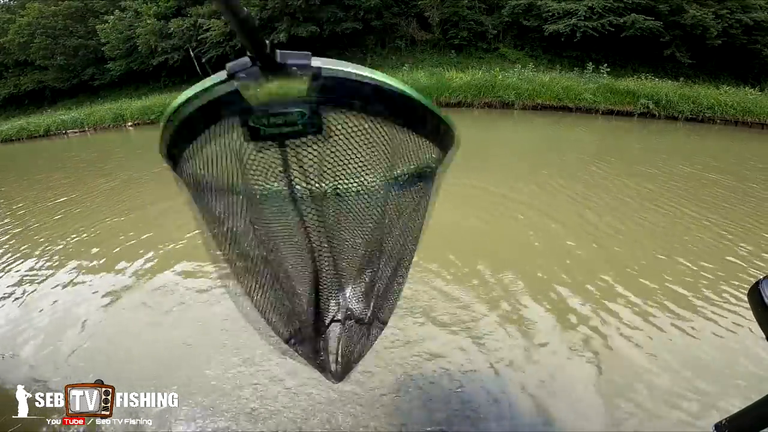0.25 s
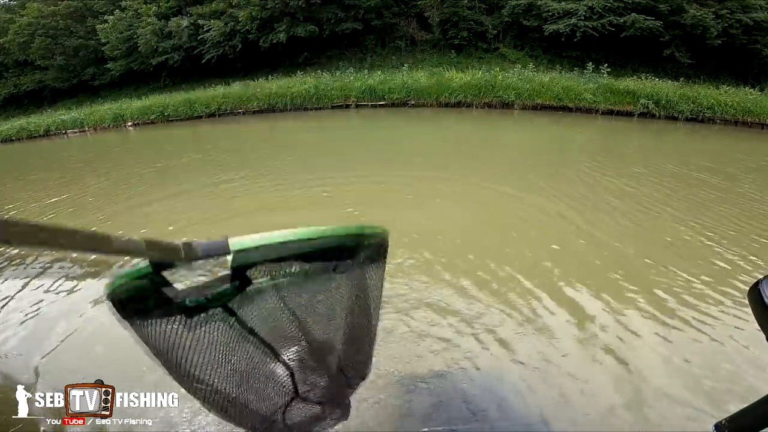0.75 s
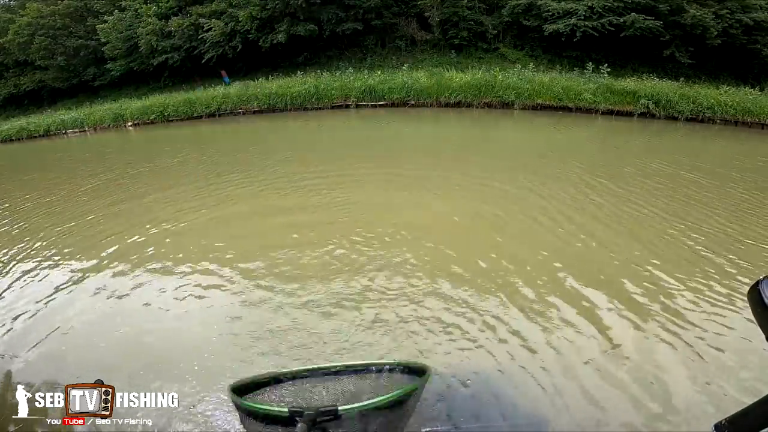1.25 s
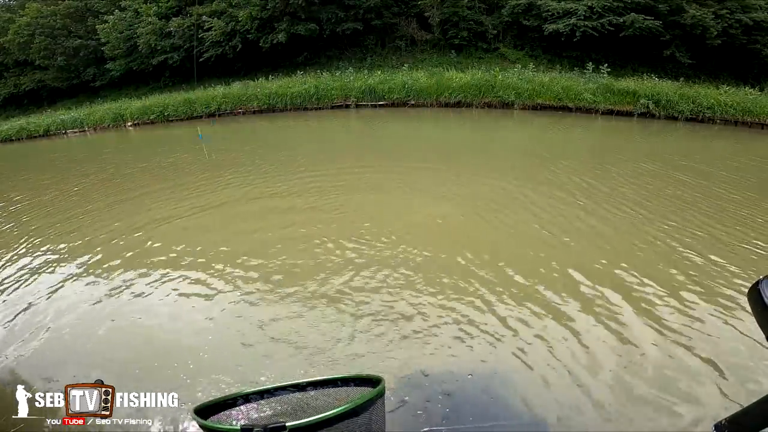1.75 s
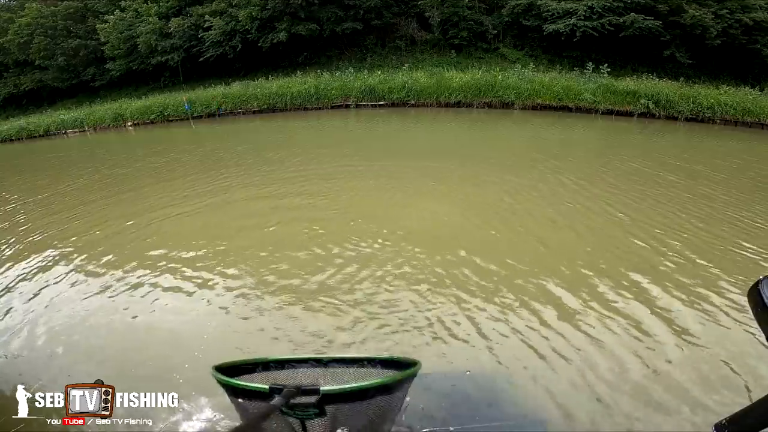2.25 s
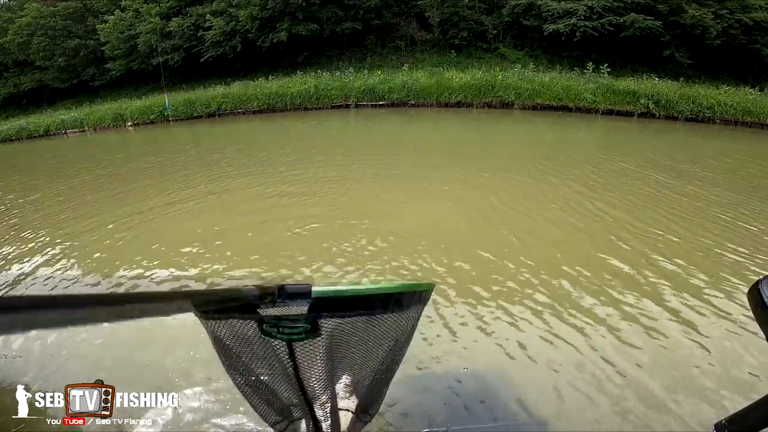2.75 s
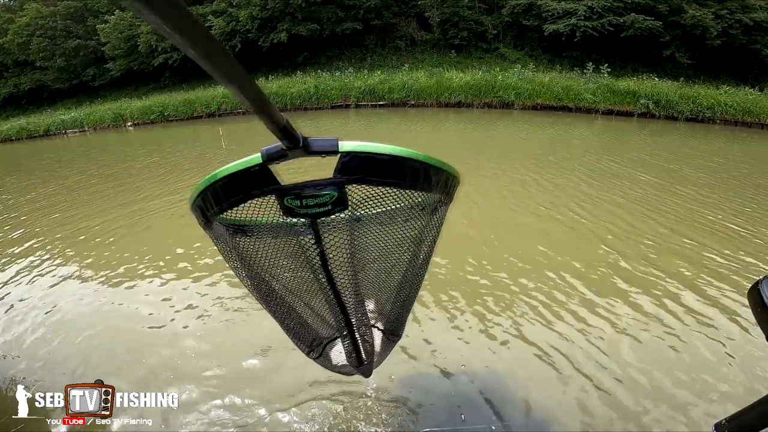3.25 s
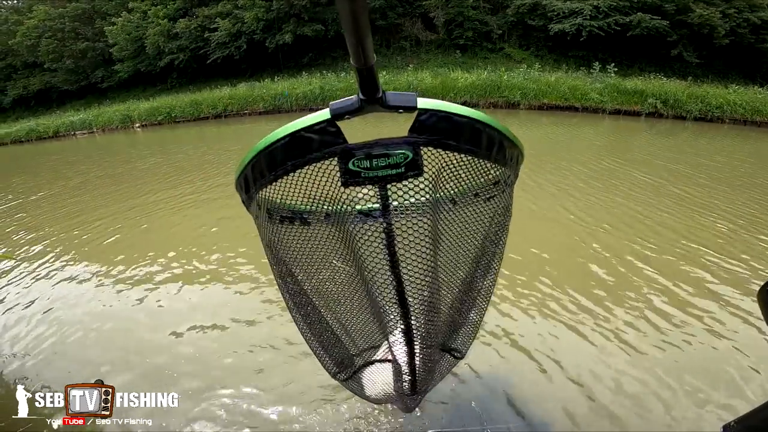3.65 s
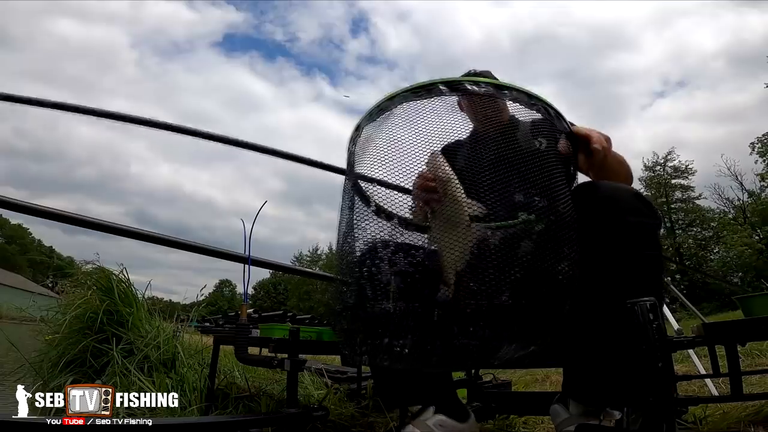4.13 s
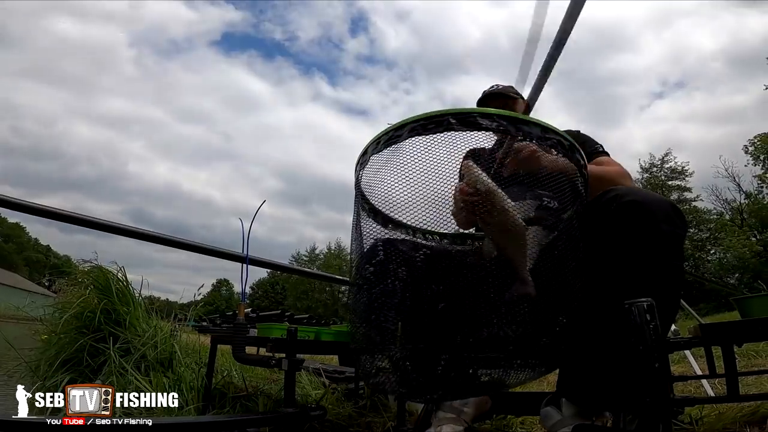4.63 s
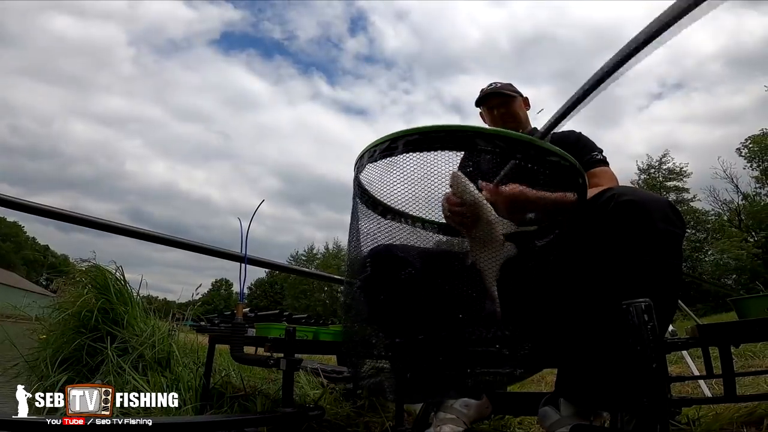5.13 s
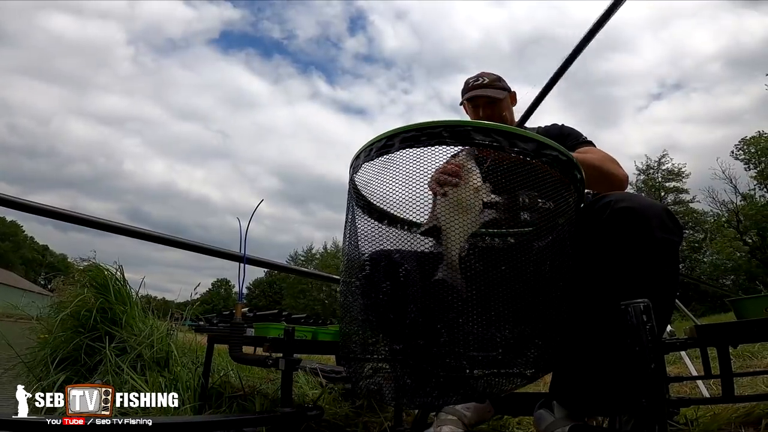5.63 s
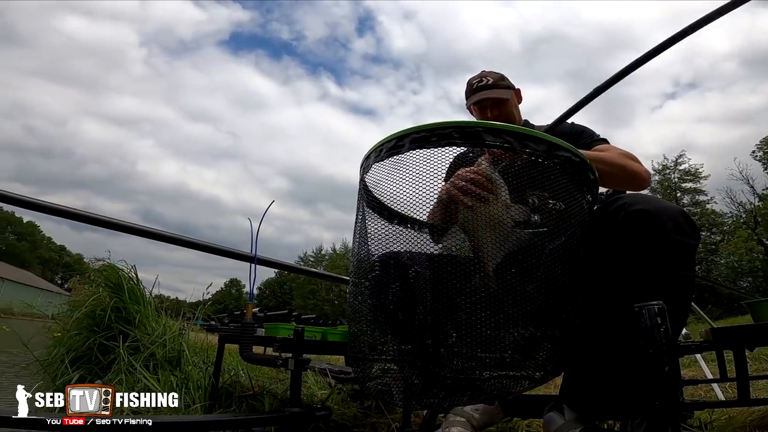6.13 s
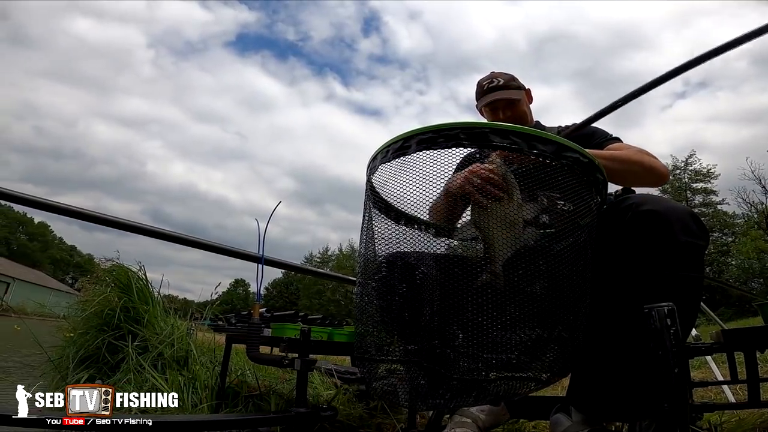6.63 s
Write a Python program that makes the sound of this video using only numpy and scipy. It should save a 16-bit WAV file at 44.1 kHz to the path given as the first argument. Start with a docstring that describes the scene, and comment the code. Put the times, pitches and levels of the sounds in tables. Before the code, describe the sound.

Wind buffets the microphone as a landing net dips and lifts streaming from a canal, then a fish kicks in wet mesh close by.

```python
"""A breeze buffets the microphone over a soft hush of trees as a small fish in a landing net swings over a canal.
The net is dipped, then lifted out streaming and dripping. Then, close by, the fish kicks in the wet mesh
while the angler takes hold of it and slides the pole back.
Wind, trees, mesh and pole are shaped noise or snaps; water is ringing bubbles, droplets and air pockets."""
import sys
import numpy as np
from scipy import signal
from scipy.fft import rfft, irfft, next_fast_len
from scipy.io import wavfile
from scipy.ndimage import uniform_filter1d

SR = 44100
rng = np.random.default_rng(int(sys.argv[2]) if len(sys.argv) > 2 else 0)


def int16_out(signal):
    """Quantize to a 16-bit WAV file."""
    q = np.round(np.clip(np.atleast_2d(signal).T, -1, 1) * 32767)
    wavfile.write(sys.argv[1], SR, q.astype(np.int16))


N = 303319
TIME = np.arange(N) / SR
CUT_S = 4.18   # the listening point moves from over the water to the bank

# spectrum of falling water: hz, relative_db_per_hz
SPRAY_COLOUR = [(400, -70), (800, -8), (1100, 2.5), (2300, 7.5), (4500, 1), (7000, -6.5), (13000, -21.5),
                (16000, -43)]
# spectrum of wet mesh: hz, relative_db_per_hz
MESH_COLOUR = [(210, -11.5), (350, -11), (459, -10), (674, -9.5), (844, -10.5), (1020, -4), (2580, -6),
               (3850, -5.5), (7430, -23), (10100, -27.5), (14800, -49), (16000, -67)]


def from_db(db):
    """Decibels to gain."""
    return 10 ** (np.asarray(db) / 20)


def rms_one(x):
    """Scale to rms 1."""
    return x / np.sqrt(np.mean(x ** 2) + 1e-20)


def in_time(rows):
    """Each column of a curve at every sample."""
    s, *columns = np.transpose(rows)
    return [np.interp(TIME, s, c) for c in columns]


def add(out, s, sound):
    """Mix a sound in at time s."""
    at = max(int(s * SR), 0)
    out[:, at:at + sound.shape[-1]] += sound[..., :max(N - at, 0)]


def panned(left_right_db):
    """Left and right gains of constant power."""
    gains = from_db(np.array([left_right_db, -left_right_db]).reshape(2, -1) / 2)
    return gains / np.sqrt(np.mean(gains ** 2, axis=0))


def coloured(x, spectrum, tilt_db=0):
    """Filter by a (Hz, dB) table, tilted by so many dB an octave."""
    size = next_fast_len(x.shape[-1])
    octave = np.log2(np.maximum(np.arange(size // 2 + 1) * SR / size, 1))
    hz, db = np.transpose(spectrum)
    gain_db = np.interp(octave, np.log2(hz), db) + tilt_db * (octave - np.log2(hz).mean())
    return irfft(rfft(x, size) * from_db(gain_db), size)[..., :x.shape[-1]]


def drift(knots_per_s):
    """Random curve: straight lines between Gaussian knots of spread 1."""
    knots = rng.standard_normal(4000)
    return np.interp(TIME * knots_per_s, np.arange(len(knots)), knots)


def stereo(pair):
    """Two unrelated signals as mid and side; the side follows its own spectrum."""
    # side against mid: hz, side_mid_db
    side_colour = [(100, -19.5), (700, -9), (1300, -9), (2400, -4), (4400, -4.5), (8000, -4)]
    return pair[0] + coloured(pair[1], side_colour) * [[1], [-1]]


def grains(size, per_s, spread_db):
    """Two trains of tiny random snaps of very uneven strength."""
    strength = from_db(spread_db * np.minimum(rng.exponential(1, (2, size)), 4))
    struck = rng.random((2, size)) < per_s / SR
    return rms_one(struck * strength * rng.choice([-1, 1], (2, size)))


def swell(s, db, build_s, linger):
    """Gain that climbs its last 20 dB in build_s to a peak at s, then falls 20 dB in linger * build_s."""
    away_s = np.maximum(s - TIME, (TIME - s) / linger)
    return from_db(db - 20 * np.minimum(away_s / build_s, 10))


def hush():
    """Far trees and open air: shaped noise, heard first over the water, then from low on the bank."""
    # spectra: hz, relative_db_per_hz
    water_colour = [(35, -27), (90, -2), (170, 4), (240, 0), (850, -18), (1200, -10), (2800, -22.5),
                    (4600, -23), (12000, -41), (15000, -70)]
    bank_colour = [(71, -52), (120, -4.5), (203, 1), (323, -10.5), (616, -19), (1110, -20.5), (1280, -19.5),
                   (5140, -31.5), (15000, -59.5)]
    water_db, bank_db = -52, -49.5
    air = rng.standard_normal((2, N))
    over_water = from_db(water_db) * rms_one(stereo(coloured(air, water_colour)))
    on_bank = from_db(bank_db) * rms_one(stereo(coloured(air, bank_colour)))
    return np.where(TIME < CUT_S, over_water, on_bank)


def wind():
    """Eddies rumble at the ports, partly shared over water, wholly on the bank; gusts swell, dull bumps hit."""
    # spectrum of the eddies: hz, relative_db_per_hz
    eddy_colour = [(12, -18), (22, 4.5), (75, 0), (120, -6.5), (180, -11), (450, -45.5), (1000, -116)]
    # light air between gusts, before flutter: time_s, level_db
    breeze_curve = [(0, -69), (1.5, -47.5), (2.3, -62), (3.0, -63), (3.8, -80), (4.2, -47), (4.9, -54.5),
                    (6.0, -49), (6.87, -38.5)]
    # gusts, before flutter and the bank's narrowing: peak_s, peak_db, build_s, left_right_db
    gust_rows = [(.06, -28, 0.11, -9), (.18, -37.5, 0.53, -1), (0.435, -30.5, 0.083, 1.5),
                 (.66, -34.5, 0.23, -1.5), (0.8, -31.5, 0.12, -7), (1.11, -39, 0.067, -8),
                 (1.27, -37.5, 0.46, -0.5), (1.409, -29, 0.1, -10.5), (2.16, -34, 0.051, -8),
                 (2.53, -42.5, 0.11, -7), (4.02, -32.5, 0.11, 4), (4.113, -29, 0.038, -4.5),
                 (5.23, -30, 0.17, -20), (5.51, -33.5, 0.12, -3), (5.72, -33, 0.19, -6),
                 (5.839, -32.5, 0.077, -8), (6.17, -39, 0.16, -2), (6.454, -26, 0.079, 2),
                 (6.57, -25.5, 0.14, -3), (6.81, -28.5, 0.15, 3)]
    # dull bumps, before the bank's narrowing: peak_s, peak_db, pitch_hz, left_right_db
    bump_rows = [(0.19, -19, 168, -33), (1.392, -19, 75.6, -36), (2.146, -22.5, 115, -29),
                 (3.949, -10.5, 143, -39), (3.964, -19.5, 122, -11), (3.993, -19, 74, 30),
                 (5.256, -22, 85, -1), (5.733, -21, 74, 0)]
    linger, bump_cycles = 0.92, 0.18   # gust fall / build time; a bump swells and dies within part of its cycle
    breeze_db, = in_time(breeze_curve)
    gust_power = sum((swell(s, db, build_s, linger) * panned(side_db)) ** 2
                     for s, db, build_s, side_db in gust_rows)
    own = rng.standard_normal((2, N)) * (TIME < CUT_S)
    shared = rng.standard_normal(N) * np.where(TIME < CUT_S, .55, .9)
    rumble = coloured(own + shared, eddy_colour)
    # level out the noise, so the gust alone sets the strength
    rumble = rumble / np.sqrt(uniform_filter1d(np.mean(rumble ** 2, axis=0), size=SR // 8))
    out = rumble * np.sqrt(from_db(breeze_db) ** 2 + gust_power) * from_db(3.7 * drift(30))
    t = np.arange(-SR // 20, SR // 20) / SR
    for s, db, hz, side_db in bump_rows:
        bump = -from_db(db) * np.cos(2 * np.pi * hz * t) / np.cosh(hz * t / bump_cycles)
        add(out, s + t[0], bump * panned(side_db))
    return out


def flow():
    """Level of the water leaving the net, in dB: a trickle, spills, and the stream of the lift, which drains."""
    # stream as the net is lifted out: time_s, level_db
    lift_curve = [(2.5, -71), (2.6, -53.5), (2.81, -47), (2.99, -48.5), (3.09, -41.5), (3.13, -45.5),
                  (3.26, -41), (3.35, -44.5), (3.41, -50)]
    # water shaken out as the net swings and dips: peak_s, peak_db, build_s
    spill_rows = [(.03, -49, .08), (.17, -48, .2), (0.469, -54, .25), (0.889, -51.5, .3), (1.26, -52, .15),
                  (1.43, -43, .15), (1.6, -47, .15), (1.791, -51.5, .15), (3.55, -50, .05),
                  (3.782, -48.5, .06)]
    trickle_db, drain_db_per_s, linger = -64.5, 24.5, 1.4   # linger: draining / build-up time
    lift_db, = in_time(lift_curve)
    drained_db = drain_db_per_s * np.maximum(TIME - lift_curve[-1][0], 0)
    stream = from_db(lift_db - drained_db) * (TIME > lift_curve[0][0])
    spill_power = sum(swell(s, db, build_s, linger) ** 2 for s, db, build_s in spill_rows)
    return 10 * np.log10(from_db(trickle_db) ** 2 + spill_power + stream ** 2)


def churn(flow_db):
    """Level and pitch of the gurgle: it follows the flow as the bag churns in air; its bubbles deepen."""
    # net bag in the canal: start_s, end_s, level_re_flow_db (before the cap), first_pitch_hz
    churn_rows = [(1.389, 1.822, -4.5, 1390), (2.698, 3.289, -2, 1143)]
    fade_db_per_s, sink_octaves_per_s, top_db = 171, 0.603, -46
    level_db, hz = np.full(N, -np.inf), np.zeros(N)
    for start, end, db, first_hz in churn_rows:
        inside = np.clip(TIME, start, end)
        this_db = np.minimum(flow_db + db, top_db) - fade_db_per_s * abs(TIME - inside)
        this_hz = first_hz * 2 ** (-sink_octaves_per_s * (inside - start))
        hz = np.where(this_db > level_db, this_hz, hz)
        level_db = np.maximum(level_db, this_db)
    return level_db, hz


def bubble(hz, t60, rise):
    """A bubble rings down 60 dB in t60 seconds while its pitch climbs by the share 'rise'."""
    t = np.arange(int(t60 * SR) + 2) / SR
    return np.sin(2 * np.pi * hz * t * (1 + rise * t / t60 / 2)) * from_db(-60 * t / t60)


def bubble_cloud(level_db, middle_hz, octaves, cycles, spread_db, rise, count):
    """Many small bubbles around a middle pitch, most of them born where the flow is strong."""
    out, strength = np.zeros((2, N)), from_db(level_db) * (TIME < CUT_S)
    chance = np.cumsum(np.sqrt(strength))
    births = np.searchsorted(chance / chance[-1], (np.arange(count) + rng.random(count)) / count)
    for at, (a, b, bulk, life, side) in zip(np.minimum(births, N - 1), rng.random((count, 5))):
        hz = middle_hz[at] * 2 ** (octaves * (a - b))
        gain = strength[at] ** .75 * np.sqrt(hz) * from_db(spread_db * bulk ** 2)
        ring = bubble(hz, cycles * (.5 + life) / hz, rise * life)
        add(out, at / SR, gain * panned((side - .5) * hz / 400) * ring)
    return rms_one(out) * np.sqrt(np.mean(strength ** 2))


def droplets(per_s, cycles, spread_db, count):
    """Spray: each droplet rings down within 'cycles' at one of 'count' pitches; each pitch fluctuates alone."""
    out = 0
    for hz in np.geomspace(900, 14000, count):
        r, w = from_db(-60 * hz / (cycles * SR)), 2 * np.pi * hz / SR
        hits = grains(N, per_s / count, spread_db) + 1e-18
        rings = signal.lfilter([1, 0, -1], [1, -2 * r * np.cos(w), r * r], hits)
        out = out + rms_one(rings) * np.sqrt(hz) * from_db(3 * drift(110))
    return out


def runoff():
    """Water falls through the mesh: thin spray, a patter of drops, ringing bubbles and larger gurgling ones."""
    flow_db = flow()
    gurgle_db, gurgle_hz = churn(flow_db)
    pouring = np.interp(TIME, [1.3, 1.4], [0, 1])   # more drops and bubbles once the net has met the water
    fine = droplets(per_s=5000, cycles=12.4, spread_db=1.5, count=16)
    spray = rms_one(stereo(coloured(fine, SPRAY_COLOUR))) * from_db(-2 * pouring)
    ticks = droplets(per_s=800, cycles=26, spread_db=4.5, count=18)
    impacts = grains(N, per_s=200, spread_db=4)
    patter = rms_one(stereo(coloured(rms_one(ticks) + impacts / 2, SPRAY_COLOUR, tilt_db=4.0)))
    patter = patter * from_db(-5 * (1.75 - pouring))
    falling = (spray + patter) * from_db(flow_db - 1.5 + 3.6 * drift(70)) * (TIME < CUT_S)
    fizz = bubble_cloud(flow_db - 14 + 11 * pouring, np.full(N, 2700), octaves=1.1, cycles=38,
                        spread_db=13, rise=.25, count=600)
    gurgle = bubble_cloud(gurgle_db, gurgle_hz, octaves=.75, cycles=32, spread_db=12, rise=.18, count=240)
    return falling + fizz + gurgle


def wet_mesh(pair, tilt_db, fold_hz, uneven_db):
    """Mesh colour: one main fold resonates; smaller folds and water pockets differ at every touch."""
    fold_db, fold_octaves = 5, 0.31   # height and width of the main resonance
    hz = np.geomspace(200, 16000, 60)
    main_db = fold_db * np.exp(-(np.log2(hz / fold_hz) / fold_octaves) ** 2 / 2)
    folds = np.column_stack([hz, main_db + uneven_db * rng.standard_normal(len(hz))])
    return rms_one(stereo(coloured(coloured(pair, folds), MESH_COLOUR, tilt_db)))


def dragging(size, tilt_db, fold_hz, count):
    """Patches of mesh catch and let go on their own, each with its own colour; single threads crackle on top."""
    crackle_db = -5   # threads that snap free, against the drag
    out = 0
    for _ in range(count):
        snaps = wet_mesh(grains(size, per_s=1000, spread_db=2.2), tilt_db, fold_hz, uneven_db=4.5)
        out = out + snaps * from_db(4.5 * drift(220)[:size])
    # level out the snaps, so the pull alone sets the strength
    out = out / np.sqrt(uniform_filter1d(np.mean(out ** 2, axis=0), size=SR // 70))
    crackle = wet_mesh(grains(size, per_s=170, spread_db=2), tilt_db, fold_hz, uneven_db=4.5)
    return (out + from_db(crackle_db) * crackle) / np.hypot(1, from_db(crackle_db))


def fish():
    """Smacks are single wet cracks; kicks are short runs of snaps as mesh tightens and drags over scales."""
    # smacks of fish and wet net: start_s, nominal_db, tilt_db_per_octave, fold_hz
    smack_rows = [(0.158, -45, 12, 4970), (0.1862, -26, 2, 3370), (.192, -33, 3, 3200),
                  (0.944, -32.5, 0.5, 2000), (1.032, -29.5, 3.5, 1440), (1.0934, -31.5, 5.5, 3650),
                  (1.3606, -22, 7.5, 1040), (1.388, -29, 2.5, 3000), (1.676, -32, -2.5, 3000),
                  (3.347, -31.5, 3, 1900), (4.938, -21, -1.5, 1030), (4.94, -33, 9, 1200),
                  (5.005, -29, 3.5, 3830), (5.1128, -33, 0, 2400), (5.3363, -34.5, 10.5, 5840),
                  (6.207, -39.5, 9, 8300)]
    # wriggles in wet mesh: start_s, nominal_db, length_s, tilt_db_per_octave, fold_hz
    kick_rows = [(0.02, -41, 0.0033, 8, 3380), (0.194, -45.5, 0.033, -3, 2500),
                 (0.938, -40, 0.034, 1.1, 1650), (1.021, -44.5, 0.046, 2.5, 2850),
                 (1.269, -40, 0.01, -6, 2000), (1.362, -38.5, 0.06, 3.5, 1290),
                 (1.555, -34, 0.011, 1, 2920), (1.581, -41, 0.017, 7, 3650),
                 (4.747, -45.5, 0.0094, -1, 3000), (4.798, -35, 0.036, 1.5, 2150),
                 (4.857, -38.5, 0.018, 2.5, 3960), (4.933, -29.5, 0.016, -0.5, 755),
                 (4.958, -39, 0.055, -0.5, 930), (5.046, -41, 0.0095, 1.5, 3000),
                 (5.106, -36.5, 0.022, 2.5, 2460), (5.155, -32.5, 0.0091, -0.2, 3340),
                 (5.237, -41.5, 0.0068, -0.5, 3630), (5.296, -46.5, 0.0055, 4, 2900),
                 (5.439, -45, 0.0064, -2, 650), (5.479, -38, 0.0047, -4.5, 875),
                 (5.519, -43.5, 0.0085, 12, 5340), (5.576, -39, 0.02, -0.5, 2380),
                 (5.635, -48, 0.011, -0.5, 2800), (5.675, -40, 0.0035, -0.5, 1050),
                 (5.692, -41, 0.021, -0.2, 3000), (5.806, -43.5, 0.0098, 1.5, 2360),
                 (5.894, -32.5, 0.02, -0.5, 3830), (5.943, -45.5, 0.033, -1, 2440)]
    smack_t60_s, kick_t60_s = 0.043, 0.091
    kick_lead_s = .03   # the mesh tightens faintly for this long before it slips
    out, t = np.zeros((2, N)), np.arange(SR // 5) / SR
    for s, db, tilt_db, fold_hz in smack_rows:
        crack = wet_mesh(rng.standard_normal((2, len(t))), tilt_db, fold_hz, uneven_db=3)
        crack = crack * np.minimum(t / .0004, 1)
        add(out, s, crack * (from_db(db + 4.5 - 60 * t / 0.0026) + from_db(db - 1.5 - 60 * t / smack_t60_s)))
    t = t - kick_lead_s
    rise_db = np.interp(t, [-kick_lead_s, 0, .003], [-33, -14, 0])
    for s, db, length, tilt_db, fold_hz in kick_rows:
        fade_db = -60 * np.maximum(t - length, 0) / kick_t60_s
        catching_db = 2 * drift(260)[:len(t)]
        drag = dragging(len(t), tilt_db, fold_hz, count=4)
        add(out, s + t[0], drag * from_db(db + rise_db + fade_db + catching_db))
    return out * panned(3.4 * (TIME < CUT_S))


def plips():
    """A hard drop's bubble bursts at once: a plink of a few cycles, a quick echo if high, a faint patter."""
    # hard drops: start_s, plink_db (before its decay), first_pitch_hz
    plip_rows = [(.047, -34, 5000), (.254, -32, 5000), (.372, -35, 3600), (1.4664, -31, 540),
                 (2.8632, -24.5, 1900), (3.042, -24, 3400), (3.083, -21, 3080), (3.103, -21, 4570),
                 (3.201, -22.5, 2980), (3.397, -24, 4070), (3.595, -26, 4640), (3.7371, -15.5, 3600),
                 (3.761, -28, 1750), (3.7672, -28, 2500), (3.8456, -17.5, 4080), (4.1371, -24, 1530)]
    t60_cycles, echo_s, echo_db = 11.7, 0.00244, -5   # the echo comes from the bank
    out, t = np.zeros((2, N)), np.arange(SR // 16) / SR
    for s, db, hz in plip_rows:
        plink = from_db(db) * bubble(hz, t60_cycles / hz, rise=.2)
        plink = plink * np.minimum(np.arange(len(plink)) * 4 * hz / SR, 1)   # pinches off in a quarter cycle
        splash = wet_mesh(grains(len(t), per_s=1500, spread_db=3), 3 * np.log2(hz / 1500), hz, uneven_db=3)
        add(out, s, plink)
        add(out, s + echo_s, from_db(echo_db) * plink * (hz > 1600))
        add(out, s, splash * from_db(db - 22 - 60 * t / .06))
    return out


def swishes():
    """Fine spray is flicked off the swinging mesh in a bright, smooth hiss."""
    # swings of the net, before flutter: peak_s, peak_db, build_s
    swing_rows = [(.15, -46, 0.058), (.47, -56.5, 0.41), (0.899, -61, 0.3), (2.402, -54, 0.044)]
    linger, tilt_db = 0.35, 9.5   # dying / build-up time; dB per octave brighter than spray
    hiss = rms_one(stereo(coloured(rng.standard_normal((2, N)), SPRAY_COLOUR, tilt_db)))
    gain = sum(swell(s, db, build_s, linger) for s, db, build_s in swing_rows)
    return hiss * gain * from_db(4.9 * drift(147))


def drops():
    """Each drop ticks, rings a bubble, splashes and may rebound; the bank returns a quick echo."""
    # drops and plops that trap a bubble: start_s, ring_db (before its decay), first_pitch_hz
    drop_rows = [(0.389, -43.5, 905), (.76, -43, 3280), (0.778, -35, 1970), (1.362, -10, 2080),
                 (1.411, -34, 1354), (1.444, -34, 4440), (1.533, -35, 3870), (1.617, -47, 1054),
                 (1.6763, -19, 1280), (1.6835, -25.5, 1080), (1.703, -37, 1090), (1.729, -40, 405),
                 (1.736, -29, 1186), (1.774, -37, 930), (1.908, -38.5, 1660), (2.624, -37, 1380),
                 (2.715, -38, 3090), (2.8628, -26.5, 476), (2.982, -31, 1020), (3.065, -27, 4000),
                 (3.152, -32, 2470), (3.214, -27.5, 1790), (3.26, -42, 590), (3.265, -23.5, 3070),
                 (3.298, -27, 1540), (3.47, -21, 2800), (3.5041, -21.5, 2400), (3.5344, -33, 2270),
                 (3.535, -39, 780), (3.544, -28, 4020), (3.593, -28.5, 7800), (3.614, -33, 1570),
                 (3.653, -25.5, 2750), (3.7555, -25.5, 2260), (3.76, -34.5, 1030), (3.786, -22, 4130),
                 (3.83, -28, 4340), (3.9622, -27, 4500), (3.9805, -28, 2940), (4.0152, -28, 7300),
                 (4.093, -28.5, 2940), (4.13, -32.5, 8500)]
    ring_t60_s, at_hz, at_db = 0.017, 2000, -26   # ring of a middling bubble
    size_power, halves_db = 0.88, 13.5   # larger bubbles ring longer; harder blows burst them sooner
    rebound_db = -15   # the droplet thrown up again, before its random spread
    out, t = np.zeros((2, N)), np.arange(SR // 8) / SR
    for s, db, hz in drop_rows:
        t60 = ring_t60_s * (at_hz / hz) ** size_power * 2 ** ((at_db - db) / halves_db)
        ring = from_db(db) * bubble(hz, t60, rise=0.09)
        ring = ring * np.minimum(np.arange(len(ring)) * hz / SR, 1)   # pinches off within a cycle
        around_pitch = [(hz / 4, -32), (hz / 2, -18), (hz, 0), (hz * 2, -11), (hz * 8, -34)]
        splash = rms_one(stereo(coloured(rng.standard_normal((2, len(t))), around_pitch)))
        tick_tilt_db = 3 * np.log2(hz / 3000)
        tick = rms_one(stereo(coloured(rng.standard_normal((2, len(t))), SPRAY_COLOUR, tick_tilt_db)))
        add(out, s, ring)
        echo_s = rng.uniform(0.001767, 0.00347)
        add(out, s + echo_s, from_db(-5.5) * ring * panned(rng.normal(0, 7.8)))
        add(out, s, splash * (from_db(db - 11 - 60 * t / .01) + from_db(db - 22 - 60 * t / .08)))
        delay_s, octaves, uneven_db = rng.uniform([.018, -.2, -6], [.055, .8, 2])
        rebound = bubble(hz * 2 ** octaves, 24 / hz, rise=.15) * (hz > 1500)   # only small drops rebound
        add(out, s + delay_s, from_db(db + rebound_db + uneven_db) * rebound)
        add(out, s, tick * from_db(db - 37 - 60 * t / 0.0012) * panned(-1))
    return out


def gulps():
    """Larger air pockets swell and fade as they surface, wobbling in shape, while their pitch glides."""
    # air pockets: peak_s, peak_db (before flutter), pitch_hz (before wobble), octaves_per_s, decay_constant_s
    gulp_rows = [(0.415, -43, 1028, 27, 0.0068), (1.632, -35, 1220, 32, 0.0034),
                 (1.74, -30, 1105, 40, 0.012), (1.819, -38.5, 1990, 13, 0.0093),
                 (2.741, -35, 2200, 33.5, 0.0057), (3.558, -40.5, 1010, 34.5, 0.0087),
                 (3.78, -44, 1198, 15, 0.0083), (3.793, -43, 2450, 18.5, .006),
                 (4.981, -32.5, 457.6, -4, 0.016)]
    flutter_db, wobble_octaves = 3, .035
    out = np.zeros((2, N))
    for s, db, hz, glide, decay_s in gulp_rows:
        t = np.arange(-int(4 * decay_s * SR), int(4 * decay_s * SR)) / SR
        wobble = wobble_octaves * drift(300)[:len(t)]
        phase = 2 * np.pi * np.cumsum(hz * 2 ** (glide * t + wobble)) / SR
        envelope = np.exp(-abs(t) / decay_s) * signal.windows.tukey(len(t))
        add(out, s + t[0], from_db(db) * np.sin(phase) * envelope)
    return out * from_db(flutter_db * drift(250))


def glugs():
    """Water sloshes in a hollow and keeps it ringing; the hollow grows, so its pitch sinks."""
    # hollows under the rising net bag: start_s, length_s, level_db (before end fades), first_pitch_hz
    hollow_rows = [(2.681, 0.04, -46, 1170), (2.722, .075, -49, 741), (2.822, 0.077, -52, 1276),
                   (2.983, 0.16, -48, 1056)]
    sink_octaves_per_s, sloshes_per_s = 5.2, 260
    out = np.zeros((2, N))
    for start, length, db, hz in hollow_rows:
        t = np.arange(int(length * SR)) / SR
        phase = 2 * np.pi * np.cumsum(hz * 2 ** (-sink_octaves_per_s * t)) / SR
        slosh = (drift(sloshes_per_s) + 1j * drift(sloshes_per_s))[:len(t)]
        ringing = rms_one(np.real(slosh * np.exp(1j * phase)))
        add(out, start, from_db(db) * ringing * signal.windows.tukey(len(t), 1 / 5))
    return out


def handling():
    """The mesh rustles unevenly in the hands and the pole slides back with a smooth hiss."""
    # wet mesh rubbing in the hands: time_s, nominal_db (14 dB above the level used)
    rub_curve = [(4.5, -45), (4.8, -44.5), (4.99, -31), (5.242, -45), (5.552, -41), (6.3, -53.5)]
    # pole sliding back: time_s, level_db
    slide_curve = [(4.17, -90), (4.195, -52), (4.42, -50), (4.52, -62.5), (4.62, -63), (4.72, -101)]
    # spectrum of the sliding pole: hz, relative_db_per_hz
    pole_colour = [(290, -38), (500, -16), (1160, -5), (1320, -11), (2850, -8.5), (7860, -18),
                   (9770, -13.5), (13300, -27.5), (16000, -38)]
    rub_db, = in_time(rub_curve)
    slide_db, = in_time(slide_curve)
    held = (TIME > rub_curve[0][0]) & (TIME < rub_curve[-1][0])
    snaps = grains(N, per_s=2500, spread_db=3.5)
    rustle = rms_one(stereo(coloured(snaps, MESH_COLOUR))) * from_db(rub_db - 14.0 + 3.8 * drift(45)) * held
    slide = rms_one(stereo(coloured(rng.standard_normal((2, N)), pole_colour))) * from_db(slide_db)
    return rustle + slide


def port_lag(x):
    """The sound as it reaches the farther port; in the treble the phase lag stops growing."""
    lag_s, limit_rad = .000025, 0.53
    size = next_fast_len(N)
    phase = np.minimum(2 * np.pi * np.fft.rfftfreq(size, 1 / SR) * lag_s, limit_rad)
    return irfft(rfft(x, size) * np.exp(-1j * phase), size)[:N]


def scene():
    """Wide over the water, reaching the right port first; narrowed to the centre on the bank."""
    water = runoff() + plips() + swishes() + drops() + gulps() + glugs()
    left, right = hush() + wind() + water + fish() + handling()
    left = np.where(TIME < CUT_S, port_lag(left), left)
    width = np.where(TIME < CUT_S, 1, from_db(-65))
    mid, side = (left + right) / 2, (left - right) / 2
    microphone_hiss = from_db(-85.5) * rng.standard_normal((2, N))
    return mid + width * side * [[1], [-1]] + microphone_hiss


def record(dry):
    """A steep elliptic low-pass cuts the top."""
    cutoff_hz = 15600
    return signal.sosfilt(signal.ellip(10, .1, 80, cutoff_hz, fs=SR, output="sos"), dry)


dry = scene()
out = record(dry)
int16_out(out)
```